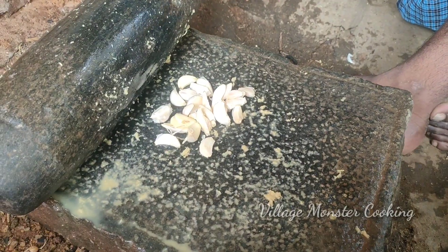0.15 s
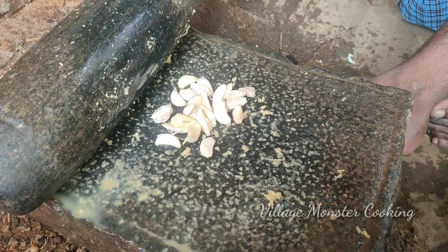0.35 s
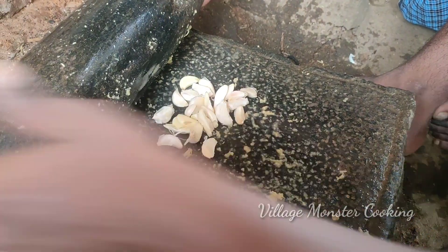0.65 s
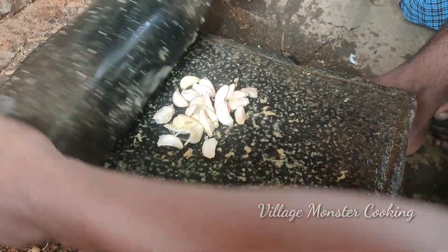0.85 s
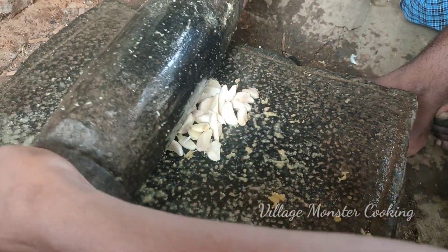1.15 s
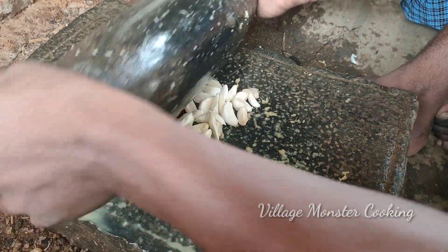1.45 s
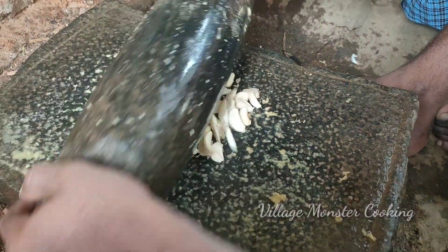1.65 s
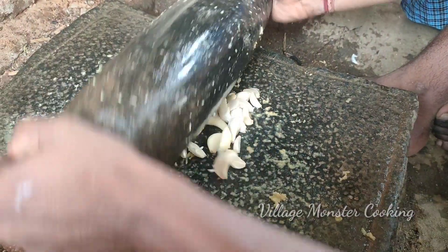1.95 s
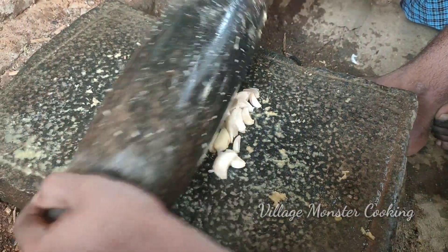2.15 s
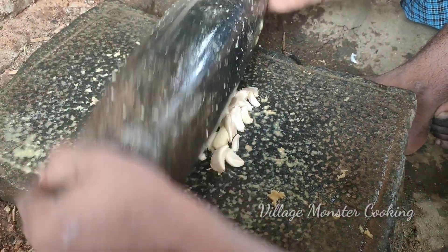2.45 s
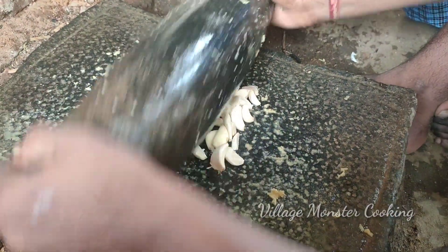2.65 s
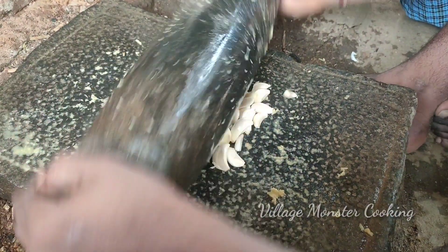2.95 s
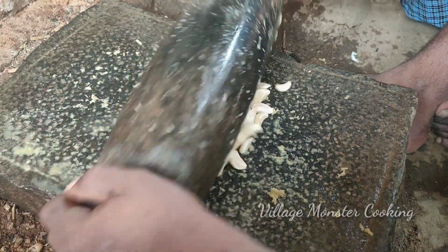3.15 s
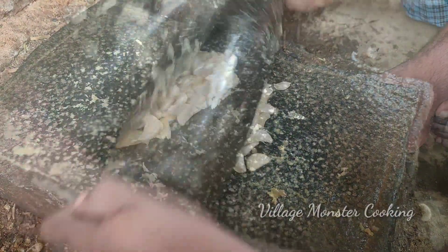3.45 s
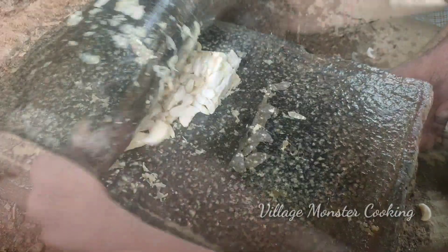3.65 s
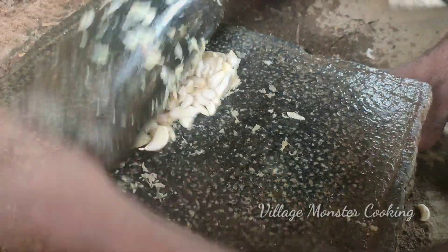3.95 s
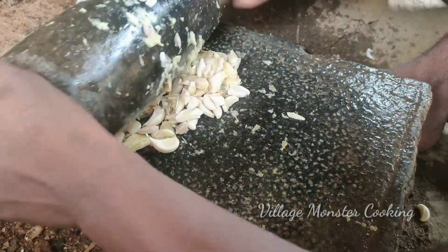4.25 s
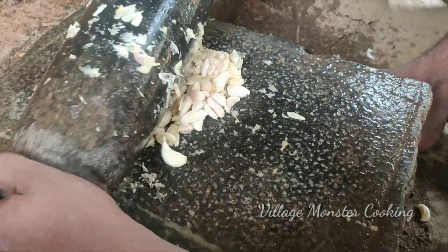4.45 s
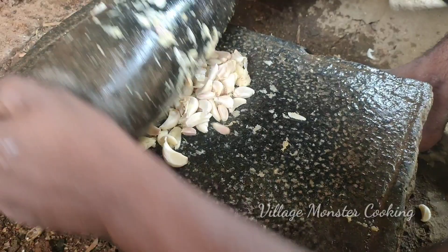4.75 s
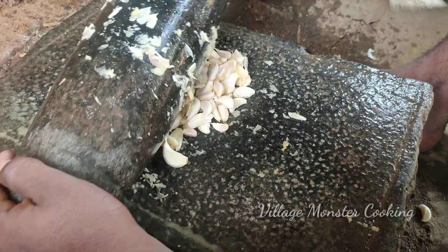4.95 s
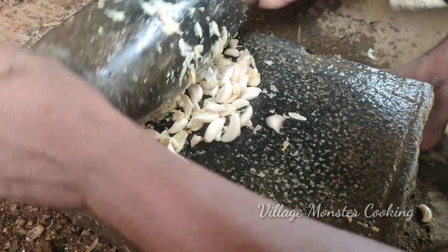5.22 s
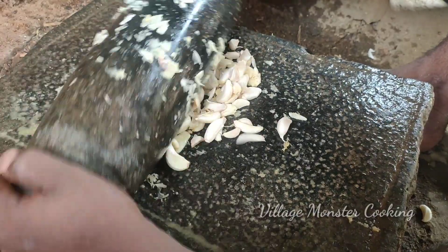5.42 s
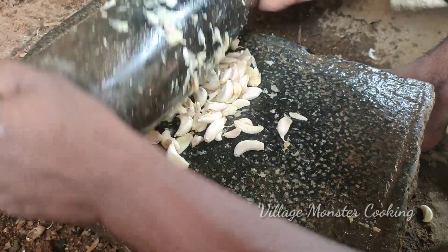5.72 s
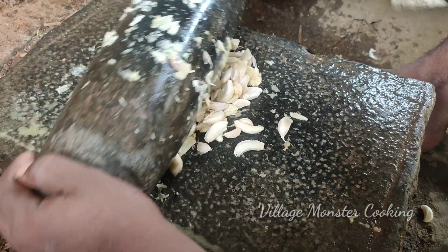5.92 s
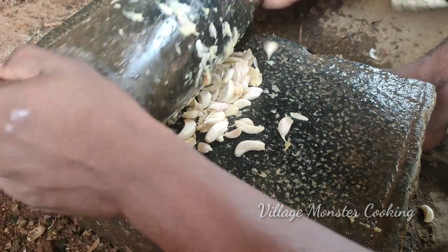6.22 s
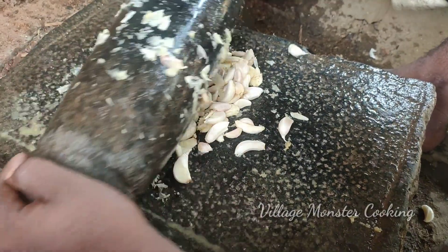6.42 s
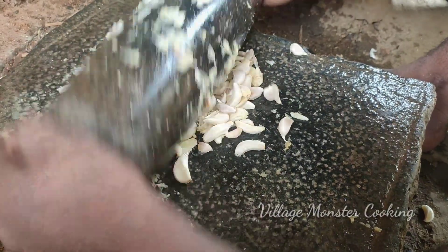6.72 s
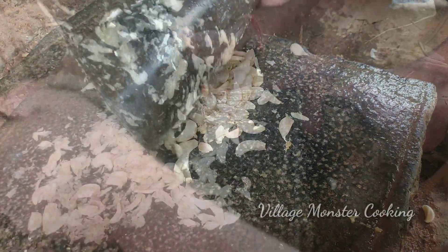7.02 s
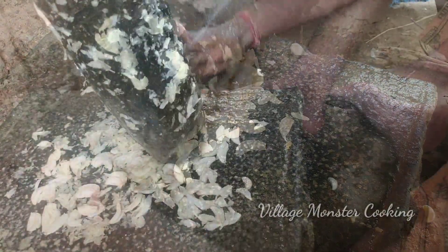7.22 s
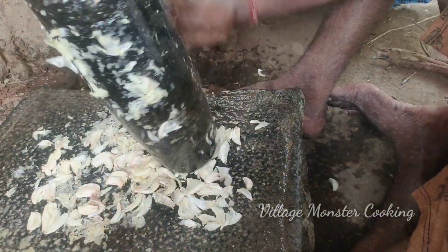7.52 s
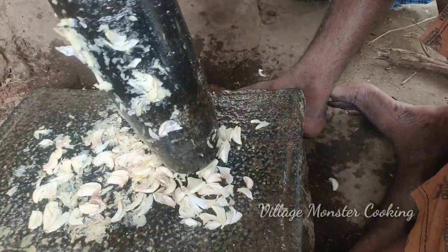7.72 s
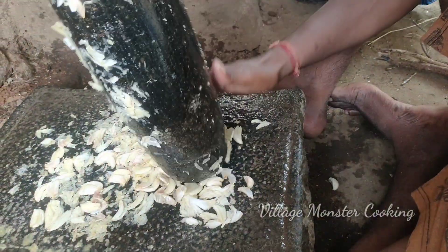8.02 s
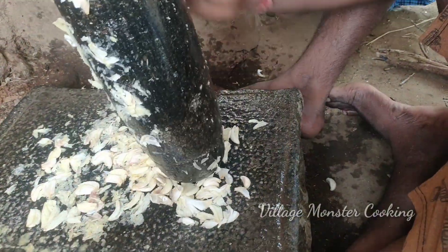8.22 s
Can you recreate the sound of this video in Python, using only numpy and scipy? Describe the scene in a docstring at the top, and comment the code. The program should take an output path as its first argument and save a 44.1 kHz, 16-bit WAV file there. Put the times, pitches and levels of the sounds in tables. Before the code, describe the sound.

Soft hollow bumps, like a vessel nudged aside, then a faint grind of stone dragged on stone. A heavy stone roller starts pounding garlic on a slab: hard knocks with deep thumps and quick rebounds, each near a crisp wet crunch. Strongest early, then more cushioned and duller, fading at the end. Close stereo microphone, small dry room, faint low rumble.

```python
"""Something hollow is bumped aside first and a heavy stone roller is dragged into place on a flat stone slab.
The roller then pounds garlic, about four to six strokes a second, in a home kitchen. Around the blows the
cloves burst with a wet crunch, built from noise grains and short pops. Stone meeting stone knocks, thumps
and rebounds: force pulses drive damped resonances. Random echoes give the room, over a rumble and a hush."""
import sys
import numpy as np
from scipy import signal
from scipy.fft import rfft, irfft, next_fast_len
from scipy.io import wavfile

SR = 44100
rng = np.random.default_rng(int(sys.argv[2]) if len(sys.argv) > 2 else 0)


def persist_wave(psi):
    """Save psi, clipped to +-1, as 16-bit WAV."""
    counts = np.round(np.clip(psi, -1, 1) * 32767).astype(np.int16)
    wavfile.write(sys.argv[1], SR, np.atleast_2d(counts).T)


N = 369161

# blows of the roller on the slab: t/s, relative stone knock level/dB, relative low thump level/dB
BLOW_EVENTS = [(1.077, -49.5, -41.5), (1.387, -74.5, -54.5), (1.4331, -67, -43.5), (1.451, -68.5, -44),
               (1.494, -51.5, -42), (1.541, -51, -43.5), (1.6833, -38, -39), (1.8056, -14, -16.5),
               (2.0877, -19, -20), (2.2699, -13.5, -18), (2.4347, -16.5, -17), (2.6077, -17, -19),
               (2.734, -27, -30), (2.7786, -18, -18), (2.8898, -46, -36), (2.958, -16, -17),
               (3.0469, -40, -37), (3.097, -20.5, -19), (3.222, -48, -37.5), (3.283, -17, -19.5),
               (3.3867, -40.5, -39), (3.4462, -23.5, -25), (3.5323, -45.5, -40), (3.56, -44.5, -41.5),
               (3.5958, -27.5, -29.5), (3.7093, -36, -36), (3.7399, -34.5, -32), (3.7607, -29.5, -32.5),
               (3.8751, -39, -34.5), (3.9349, -32.5, -33.5), (4.047, -42.5, -38.5), (4.0865, -25, -25.5),
               (4.2359, -31, -34.5), (4.2574, -31.5, -24.5), (4.349, -70, -36), (4.403, -39.5, -37),
               (4.4298, -36, -29), (4.4776, -23.5, -23.5), (4.9047, -50.5, -39.5), (5.0031, -25, -24.5),
               (5.125, -60, -44), (5.195, -47.5, -45), (5.2725, -21, -20.5), (5.5286, -24, -22),
               (5.7929, -23.5, -22), (6.035, -27.5, -25), (6.267, -21.5, -20.5), (6.3898, -44.5, -38.5),
               (6.4372, -49, -31), (6.4714, -22, -22), (6.637, -54, -38), (6.705, -26, -25.5),
               (6.8455, -49, -35.5), (6.8675, -23, -23), (7.0317, -28.5, -21.5), (7.1862, -43, -25.5),
               (7.2203, -28, -30), (7.395, -34, -31.5), (7.5298, -36, -25.5), (7.5583, -32.5, -33.5),
               (7.6944, -53, -36), (7.739, -48, -43), (7.912, -36, -37.5), (8.0515, -57, -48.5)]
# cloves bursting under the roller: middle t/s, half length/s, relative fizz level/dB, snap level re fizz/dB
CLOVE_BURSTS = [(1.066, 0.0034, -34, -9.5), (1.101, .018, -47, -5.5), (1.715, 0.0098, -31.5, -10),
                (1.741, 0.00346, -33.5, -9.5), (1.788, .016, -40.5, -20), (1.992, 0.008, -29.5, -13),
                (2.012, 0.007, -27.5, -16.5), (2.223, 0.016, -42.5, -4.5), (2.392, 0.015, -31, -16.5),
                (2.582, 0.022, -40.5, -11.5), (2.751, 0.016, -38.5, -9.5), (2.923, .011, -31, -10),
                (3.072, 0.016, -37.5, -12.5), (3.249, 0.0097, -31.5, -14), (3.414, 0.011, -29.5, -11.5),
                (3.557, 0.018, -38.5, -10), (3.73, .022, -39.5, -13.5), (3.894, .016, -33.5, -7.5),
                (4.061, 0.018, -34, -9), (4.188, 0.0081, -40.5, -8.5), (4.251, 0.01, -31, -8.5),
                (4.359, 0.0089, -47.5, -15), (4.458, 0.011, -34, -6), (4.667, 0.0083, -30.5, 0),
                (4.749, .008, -50, -16), (4.954, 0.0098, -31, -12), (5.202, 0.012, -30.5, -6.5),
                (5.441, 0.0064, -36, -6.5), (5.502, .0082, -28, -13), (5.721, 0.013, -33.5, -8.5),
                (5.983, 0.016, -35.5, -11.5), (6.188, 0.0085, -39.5, -6), (6.208, 0.0074, -25, -13),
                (6.402, 0.0073, -34.5, -20.5), (6.438, 0.0083, -30, -5), (6.634, 0.015, -32.5, -9.5),
                (6.683, 0.0058, -41.5, -26), (6.846, 0.0032, -26.5, -4), (7.03, 0.0096, -31, -12.5),
                (7.152, 0.0038, -43.5, -11), (7.19, 0.0049, -31.5, -11), (7.331, 0.013, -36.5, -12.5),
                (7.538, .013, -39.5, -9), (7.699, 0.0088, -41, -12.5), (7.894, 0.009, -38.5, -10),
                (8.054, .01, -55, -13)]
# bumps of a hollow vessel: t/s, relative level/dB
VESSEL_BUMPS = [(.074, -30.5), (0.132, -62), (.179, -49.5), (0.242, -39), (.302, -28.5), (.351, -30)]
# spectrum of the high fizz at each side: f/Hz, relative level per Hz/dB
FIZZ_LEFT_SPECTRUM = [(3500, -28.5), (5000, -9), (6000, 6), (6800, 11.5), (7400, 7.5), (7800, -4.5),
                      (8200, -57.5), (9500, -75)]
FIZZ_RIGHT_SPECTRUM = [(3500, -19.5), (5000, -11.5), (6000, -17), (6800, -5.5), (7500, -5), (7800, -7),
                       (8200, -29.5), (9500, -66.5)]
# spectrum of the scatter from things close by: f/Hz, relative level/dB
SCATTER_SPECTRUM = [(60, -34), (150, -5.5), (300, -2), (470, -19.5), (700, -15.5), (1100, -11.5),
                    (1800, -10), (3500, -13), (7000, -19.5), (8500, -32.5)]
SCATTER_T60_S = 0.099
FULL_DB = -14.5  # stone knock of a full blow
FIRM_DB = -29  # a blow with a stronger stone knock than this is firm


def blows(knock_db=-0.58, thump_db=-3.5, shove_db=-8.0, ring_db=-0.5, hard_hz=1250, bed_hz=600,
          cushion_db=13.0, stop_s=.0011, slower=0.4, crest=2.72, uneven=.12):
    """Impact excitation: a blow and its rebound drive stones and bed; garlic between softens the contact."""
    # the two stones pressed together: f/Hz, bandwidth/Hz, relative level/dB
    stone_modes = [(654.7, 72, 10), (817, 440, 2.5), (867, 170, -1), (1096, 41, -4), (1450, 160, -19),
                   (1760, 470, 2), (2370, 500, -16)]
    # the slab rocking on its bed: f/Hz, bandwidth/Hz, relative level/dB
    bed_modes = [(108, 12, -9), (161.6, 11, 5), (241, 100, 0), (329, 90, 4.5)]
    # the roller's own high notes: f/Hz, relative level/dB, t60/s
    roller_modes = [(3630, -21, 0.064), (3680, -25, .05), (3600, -51, 0.35), (3914, -32, .04),
                    (2720, -30, .025), (4200, -35, .03), (2020, -41.5, 0.07)]
    # echoes from floor, legs and wall: delay/s, relative level/dB
    echo_paths = [(.0024, -10.5), (.0072, -13), (.0108, -16), (0.018, -18.5)]
    contact_s = 0.00046  # the force builds this long after the first touch
    shortest_rebound_s, full_flight_s, rebound_db = 0.00477, 0.0069, -7.5
    out = np.zeros((2, N))
    for touch_s, stone_db, bed_db in BLOW_EVENTS + nudges():
        s = touch_s + contact_s
        contact_hz = hardness_hz(stone_db)
        # a weaker blow bounces sooner
        flight_s = full_flight_s * from_db(stone_db - FULL_DB) ** 2
        rebound_s = (shortest_rebound_s + flight_s) * rng.normal(1, uneven)
        taps = np.zeros(SR // 10)
        taps[0] = -1
        taps[int(np.clip(rebound_s, .002, .05) * SR)] -= from_db(rebound_db)
        knock = body(lowpass(taps, contact_hz, order=4), stone_modes, wander=.05)
        knock = at_level(knock, stone_db + knock_db)
        # each near echo arrives from a direction of its own
        echoes = 0
        for delay_s, db in echo_paths:
            echo = from_db(db) * late(knock, delay_s * rng.normal(1, .08))
            echoes = echoes + place(echo, 0, rng.normal(0.00013, .00018))
        # a blow cushioned by cloves knocks less and pushes for longer, so its thump is deeper
        cushion = np.clip((bed_db - stone_db) / cushion_db, 0, 1)
        thump = body(lowpass(taps, bed_hz / (1 + cushion), order=3), bed_modes, wander=.07)
        thump = at_level(thump, bed_db + thump_db)
        heard = place(knock, -1.6, 0.00015) + echoes + place(thump, -0.33, 0.000085)
        width_s = stop_s * (1 + slower * cushion)
        push = place(at_level(shove(width_s), bed_db + shove_db), -.3, 0.00011)
        add(out, s + crest * width_s - .01, push)
        # roller and arm stand differently at every stroke, and so do the near echoes
        scatter = reflections(SCATTER_SPECTRUM, SCATTER_T60_S, start_s=0.0024, apart_hz=800, length_s=.1)
        add(out, s, heard + diffuse(heard, scatter))
        # only a hard contact reaches the roller's high notes, each by a share of its own
        if stone_db > -36:
            modes = [(hz * rng.normal(1, .004), db + rng.uniform(-4, 3), t60) for hz, db, t60 in roller_modes]
            note = ringing(modes) * from_db(stone_db + ring_db) * min(contact_hz / hard_hz, 1) ** 3
            add(out, s, place(note, 2.8, .00007))
    return out


def hardness_hz(stone_db):
    """Contact stiffness: the stronger the knock, the shorter and brighter the contact."""
    full_contact_hz, octaves_per_db = 1213, 0.01
    return full_contact_hz * 2 ** (octaves_per_db * (stone_db - FULL_DB))


def nudges():
    """Secondary contact: after each firm blow the roller rocks back and softly touches (events as blows)."""
    delay_s, delay_spread_s = .1, .012
    level_db, level_spread_db, knock_re_thump_db = -47.5, 2.0, -13.5
    firm = np.array([s for s, stone_db, bed_db in BLOW_EVENTS if stone_db > FIRM_DB])
    when, strength = np.clip(rng.standard_normal((len(firm), 2)), -2, 2).T
    thump_db = level_db + level_spread_db * strength
    return list(zip(firm + delay_s + delay_spread_s * when, thump_db + knock_re_thump_db, thump_db))


def shove(width_s):
    """Volume displacement: air squeezed out as the roller stops, a rounded pressure swing centred 10 ms in."""
    phase = (np.arange(SR // 30) / SR - .01) / width_s
    return (1 - phase ** 2) * np.exp(-phase ** 2 / 2)


def cracks(crack_db=-28.0, fade_s=.0025, hard_hz=1250):
    """Broadband transient: grit splitting between bare stones starts a blow with a short, bright crack."""
    # spectrum of the crack: f/Hz, relative level per Hz/dB
    crack_spectrum = [(1200, -17), (2000, -3.5), (2700, 2), (3700, -4.5), (4600, -7), (7000, -10.5),
                      (8200, -27)]
    out, t = np.zeros((2, N)), np.arange(SR // 40) / SR
    for s, stone_db, bed_db in BLOW_EVENTS:
        crack = colour(rng.standard_normal((2, len(t))), crack_spectrum) * np.exp(-t / fade_s)
        hardness = min(hardness_hz(stone_db) / hard_hz, 1) ** 5
        add(out, s, at_level(crack, stone_db + crack_db) * hardness)
    return out


def garlic(fizz_db=0.0, snap_db=-1.5):
    """Granular fracture: cloves burst amid a fainter crackle of dry skins; firm blows squeeze out juice."""
    # spectrum of the lower snap at each side: f/Hz, relative level per Hz/dB
    snap_left = [(600, -7.5), (1300, -7), (2000, 1), (2600, 0), (3300, 5), (4600, -0.5), (6000, -3.5),
                 (8000, -22)]
    snap_right = [(600, -16.5), (1300, -26.5), (2000, -9.5), (2600, -4), (3300, -1), (4600, -4.5),
                  (6000, -1.5), (8000, -31)]
    skin_s, skin_db = 0.02, -22  # half length, level against the burst
    squirt_after_s, squirt_s = 0.0017, .0045
    squirt_db, squirt_snap_db = -42.5, -10  # fizz, and snap against the fizz
    skins = [(s, skin_s, db + skin_db, lower_db) for s, half_s, db, lower_db in CLOVE_BURSTS]
    squirts = [(s + squirt_after_s, squirt_s, squirt_db, squirt_snap_db)
               for s, stone_db, bed_db in BLOW_EVENTS if stone_db > FIRM_DB]
    bursts = CLOVE_BURSTS + skins + squirts
    fizz = swell([(s, half_s, db + fizz_db) for s, half_s, db, lower_db in bursts])
    snap = swell([(s, half_s, db + lower_db + snap_db) for s, half_s, db, lower_db in bursts])
    high = fizz * crackle(FIZZ_LEFT_SPECTRUM, FIZZ_RIGHT_SPECTRUM, clump_db=8.5, apart=0.91, lag_s=.00003)
    low = snap * crackle(snap_left, snap_right, clump_db=9.0, apart=0.26, lag_s=.00008)
    return high + signal.sosfilt(signal.butter(10, 7900, fs=SR, output="sos"), low)


def crackle(left, right, clump_db, apart, lag_s):
    """Partial coherence: the two sides share some grains, and the right adds others."""
    shared = grains(clump_db)
    other = shared + apart * grains(clump_db)
    return rms_one(np.array([colour(late(shared, lag_s), left), colour(other, right)]))


def grains(clump_db, per_s=900, decay_s=0.0022):
    """Shot noise: tears start at random, each a tiny burst of snapping cell walls that dies at once."""
    tears, sizes = np.zeros(N), rng.standard_normal(N)
    torn = rng.random(N) < per_s / SR
    tears[torn] = from_db(clump_db * np.clip(sizes[torn], -2, 2)) ** 2
    power = signal.lfilter([1], [1, -np.exp(-1 / (decay_s * SR))], tears + 1e-12)
    return rng.standard_normal(N) * np.sqrt(power)


def pops(pop_db=2.0, per_s=350, spread_db=1.0, cycles=4.9):
    """Short damped oscillation: juicy pops stand out of each crunch, every one at a pitch of its own."""
    out, t = np.zeros((2, N)), np.arange(SR // 100) / SR
    for s, half_s, db, lower_db in CLOVE_BURSTS:
        for when, size, pitch, side in rng.standard_normal((16, 4))[:round(2 * half_s * per_s)]:
            hz = np.clip(5200 * np.exp(.35 * pitch), 1800, 7200 - 400 * abs(side))
            # the lower the pop, the more it belongs to the snap of the flesh
            snap_share = np.clip(0.56 * np.log2(7000 / hz), 0, 1)
            level_db = db + pop_db + spread_db * min(size, 1.5) + lower_db * snap_share
            envelope = hz * t / cycles * np.exp(1 - 2 * hz * t / cycles)
            pop = np.sin(2 * np.pi * hz * t) * envelope
            add(out, s + .6 * when * half_s, from_db(level_db) * place(pop, 7 + 2 * side, .00004))
    return signal.sosfilt(signal.butter(10, 7700, fs=SR, output="sos"), out)


def grumble():
    """Low-frequency noise: in the steady pounding, the slab rumbles briefly as the roller sinks into a clove."""
    # spectrum of the grumble: f/Hz, relative level per Hz/dB
    grumble_spectrum = [(40, -21.5), (90, 2.5), (160, 3.5), (280, -7.5), (450, -27), (800, -19),
                        (1300, -36), (2000, -61)]
    pounding_from_s, sink_s, sink_db = 2.2, 0.012, -9  # start, half length, level against the fizz
    presses = [(s, sink_s, db + sink_db) for s, half_s, db, lower_db in CLOVE_BURSTS if s > pounding_from_s]
    return swell(presses) * stereo_noise(grumble_spectrum, -19)


def vessel(wander=0.0075):
    """Modal synthesis: soft bumps on something hollow, each stirring the modes differently."""
    # modes of the vessel: f/Hz, relative level/dB, t60/s
    vessel_modes = [(205.7, -12.5, 0.33), (260, -1.5, 0.054), (322, 9.5, 0.034), (390, 2.5, 0.047),
                    (434, -6, 0.13), (617, -5, 0.034), (691.5, -8.5, 0.28), (732, -11, 0.15),
                    (978, -10, 0.031)]
    out = np.zeros(N)
    for s, level_db in VESSEL_BUMPS:
        modes = [(hz * rng.normal(1, wander), db + rng.normal(0, 1.46), t60) for hz, db, t60 in vessel_modes]
        # neighbouring modes start in opposite phase
        note = sum((-1) ** k * ringing([mode]) for k, mode in enumerate(modes))
        add(out, s, from_db(level_db) * lowpass(note, 1180, order=4))
    return place(out, .7, -0.00032)


def rustle():
    """Friction noise: something dry shifts faintly with each bump."""
    # spectrum of the rustle: f/Hz, relative level per Hz/dB
    rustle_spectrum = [(1200, -25), (2100, -24), (2700, -9), (3400, -4.5), (4500, -10.5), (6800, 5),
                       (7700, 1), (8300, -50)]
    delay_s, half_s, level_db, follows = 0.0011, 0.023, -50.5, .1  # follows: dB per dB of the bump
    shifts = [(s + delay_s, half_s, level_db + follows * db) for s, db in VESSEL_BUMPS]
    dry_noise = crackle(rustle_spectrum, rustle_spectrum, clump_db=2.5, apart=0.45, lag_s=.00003)
    return swell(shifts, rise=0.16, fall=1.02) * dry_noise


def drag():
    """Sliding friction: stone grinds on stone as steady noise, with a little granular grit in between."""
    # course of the drag: t/s, grinding level/dB, grit level/dB
    drag_course = [(.55, -109, -100), (.57, -89, -63.5), (.68, -95, -89), (.71, -61, -77),
                   (.78, -62, -67.5), (.86, -57.5, -85), (1.0, -64.5, -97), (1.15, -60, -60),
                   (1.35, -100, -105)]
    # spectrum of the grinding: f/Hz, relative level per Hz/dB
    grind_spectrum = [(150, -2.5), (330, 7.5), (470, 3), (650, 8), (950, -5), (1300, -33.5), (1550, -18.5),
                      (1780, -39.5), (2020, -21), (2300, -39), (4000, -40.5)]
    grind_db, grit_db = in_time(drag_course)
    grind = from_db(grind_db) * stereo_noise(grind_spectrum, -8.5)
    grit = crackle(FIZZ_LEFT_SPECTRUM, FIZZ_RIGHT_SPECTRUM, clump_db=4.0, apart=.6, lag_s=.00003)
    return grind + from_db(grit_db) * grit


def whistles(waver=0.0046):
    """Frequency modulation: two faint, slightly unsteady tones swell and fade."""
    # the tones: loudest at t/s, half length/s, f there/Hz, glide/(Hz/s), relative level/dB
    tones = [(2.07, .1, 1600, -900, -67), (4.61, .06, 4740, 0, -61)]
    out = np.zeros((2, N))
    for s, half_s, pitch_hz, glide_hz_per_s, db in tones:
        t = np.arange(-SR // 6, SR // 6) / SR
        unsteady = rms_one(lowpass(rng.standard_normal(len(t)), 60, order=2))
        hz = (pitch_hz + glide_hz_per_s * t) * (1 + waver * unsteady)
        tone = from_db(db) * np.exp(-(t / half_s) ** 2) * np.sin(2 * np.pi * np.cumsum(hz) / SR)
        add(out, s + t[0], place(tone, 1.5, .0001))
    return out


def background(rumble_db=-3.5, hush_db=-3.0, lumps_db=4.0):
    """Stationary noise under slow modulation: uneven low rumble and a faint hush of the surroundings."""
    # course of the background: t/s, relative low rumble level/dB, relative middle hush level/dB
    background_course = [(0.0, -52.5, -102), (0.3, -58.5, -52.5), (0.56, -56.5, -76), (1.0, -55.5, -80),
                         (1.26, -57, -77), (2.49, -49.5, -57), (3.89, -49.5, -61), (4.43, -43.5, -59.5),
                         (4.68, -50, -76.5), (6.62, -54, -62.5), (7.58, -52.5, -79), (8.37, -78.5, -99)]
    # spectra of both: f/Hz, relative level per Hz/dB
    rumble_spectrum = [(20, -6.5), (30, -8.5), (45, -21.5), (70, -5.5), (105, 11), (160, 2), (300, -8),
                       (450, -18.5), (900, -50)]
    hush_spectrum = [(200, -20.5), (400, -8), (650, 0), (900, -6), (1200, -24), (2000, -34), (4000, -39.5),
                     (7000, -40), (9000, -56)]
    low_db, middle_db = in_time(background_course)
    lumps = lumps_db * np.clip(rms_one(lowpass(rng.standard_normal(N), 7, order=2)), -2, 2)
    rumble = from_db(low_db + rumble_db + lumps) * stereo_noise(rumble_spectrum, -13)
    return rumble + from_db(middle_db + hush_db) * stereo_noise(hush_spectrum, -8.5)


def reflections(spectrum, t60, start_s, apart_hz, length_s):
    """Diffuse reverberation: dense echoes die away; the two sides differ more towards the treble."""
    t = np.arange(int(length_s * SR)) / SR
    mid, side = rng.standard_normal((2, len(t)))
    side = signal.lfilter(*signal.butter(1, apart_hz, "high", fs=SR), side)
    fade = from_db(-60 * t / t60) * np.clip(t / start_s - 1, 0, 1)
    return colour(mid + side * [[1], [-1]], spectrum) * fade / np.sqrt(np.sum(fade ** 2))


def diffuse(x, response):
    """Convolution: what comes back of a stereo sound."""
    return signal.oaconvolve(x, response, axes=1)[:, :x.shape[1]]


def body(force, modes, wander):
    """Resonance: two-pole band-passes; each shifts a little with the place of contact."""
    out = 0
    for (hz, width, db), (shift, gain) in zip(modes, rng.standard_normal((len(modes), 2))):
        r = np.exp(-np.pi * width / SR)
        w = 2 * np.pi * hz * np.exp(wander * shift) / SR
        zeros, poles = (1 - r * r) / 2 * np.array([1, 0, -1]), [1, -2 * r * np.cos(w), r * r]
        out = out + from_db(db + gain) * signal.lfilter(zeros, poles, force)
    return out


def ringing(modes):
    """Free vibration: exponentially decaying sines after one tap."""
    t = np.arange(SR // 3) / SR
    return sum(from_db(db - 60 * t / t60) * np.sin(2 * np.pi * hz * t) for hz, db, t60 in modes)


def swell(events, rise=0.86, fall=.93):
    """Amplitude envelope: summed power of bursts (middle s, half length s, dB), steeper before than after."""
    t, power = np.arange(N) / SR, np.zeros(N)
    for s, half_s, db in events:
        near = slice(max(0, int((s - .12) * SR)), int((s + .12) * SR))
        phase = (t[near] - s) / half_s
        fading = np.where(phase < 0, abs(phase / rise) ** 2.1, abs(phase / fall) ** 1.5)
        power[near] += from_db(db) ** 2 * np.exp(-fading)
    return np.sqrt(power)


def stereo_noise(spectrum, side_db):
    """Mid-side coherence: coloured noise, mostly shared by the two sides."""
    mid, side = rng.standard_normal((2, N))
    return rms_one(colour(mid + from_db(side_db) * side * [[1], [-1]], spectrum))


def place(x, pan_db, lag_s):
    """Interaural cues: a level difference, and a delay of the left ear (an advance if negative)."""
    return np.array([late(x, lag_s) * from_db(pan_db / 2), x * from_db(-pan_db / 2)])


def colour(x, points):
    """Spectral shaping: filter by a curve of dB over log frequency."""
    hz, db = np.transpose(points)
    size = next_fast_len(x.shape[-1])
    f = np.fft.rfftfreq(size, 1 / SR) + 1
    gain = from_db(np.interp(np.log(f), np.log(hz), db))
    return irfft(rfft(x, size) * gain, size)[..., :x.shape[-1]]


def lowpass(x, hz, order):
    """Low-pass filtering: a Butterworth response of low order."""
    return signal.lfilter(*signal.butter(order, min(hz, .45 * SR), fs=SR), x)


def late(x, s):
    """Propagation delay: shift by s seconds, between samples if need be."""
    i = np.arange(len(x))
    return np.interp(i - s * SR, i, x, left=0)


def at_level(sound, db):
    """Energy normalisation: give a sound this level, taken over 25 ms."""
    return sound * from_db(db) / np.sqrt(np.sum(sound ** 2) / (.025 * SR))


def rms_one(x):
    """Power normalisation: scale to unit mean square."""
    return x / np.sqrt(np.mean(x ** 2) + 1e-20)


def from_db(db):
    """Level to amplitude: decibels to gain."""
    return 10 ** (np.asarray(db) / 20)


def in_time(rows):
    """Linear interpolation: curve columns at every sample."""
    s, *columns = np.transpose(rows)
    return [np.interp(np.arange(N) / SR, s, c) for c in columns]


def add(track, s, sound):
    """Superposition: mix a sound in at time s."""
    i = max(0, round(s * SR))
    track[..., i:i + sound.shape[-1]] += sound[..., :max(0, N - i)]


def scene():
    """Direct sound, scatter and reverberation: slab, garlic and small handling sounds in the kitchen."""
    # spectrum of the room's tail: f/Hz, relative level/dB
    tail_spectrum = [(60, -23), (150, -24.5), (300, -30.5), (700, -34.5), (1200, -28), (2000, -25),
                     (3500, -23.5), (5000, -27), (7000, -25.5)]
    small = garlic() + pops() + cracks() + vessel() + rustle() + whistles()
    scatter = reflections(SCATTER_SPECTRUM, SCATTER_T60_S, start_s=0.001, apart_hz=900, length_s=.15)
    close = blows() + small + diffuse(small, scatter)
    tail = reflections(tail_spectrum, t60=0.38, start_s=0.007, apart_hz=400, length_s=1.0)
    room = diffuse(close, tail)
    return from_db(-2.5) * (close + room) + grumble() + drag() + background()


def record(dry):
    """Band limiting: the deep bass is thinned and the top is cut."""
    bass_hz, cutoff_hz = 67, 8900
    thinned = signal.sosfilt(signal.butter(2, bass_hz, "high", fs=SR, output="sos"), dry)
    return signal.sosfilt(signal.butter(14, cutoff_hz, fs=SR, output="sos"), thinned)


dry = scene()
out = record(dry)
persist_wave(out)
```